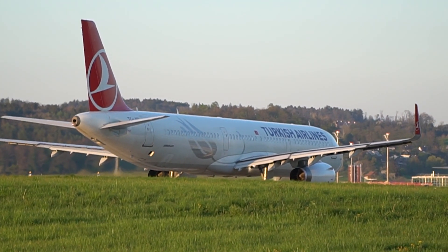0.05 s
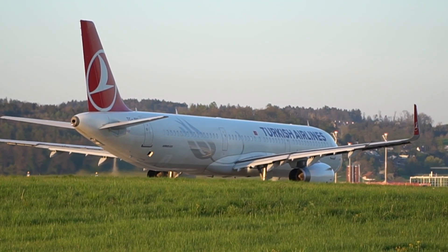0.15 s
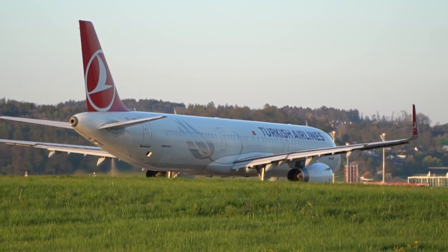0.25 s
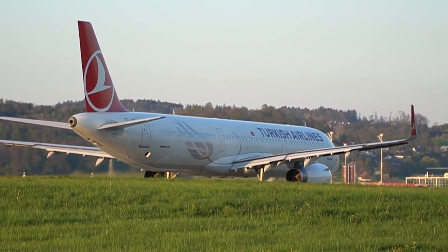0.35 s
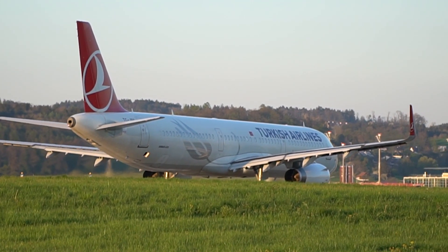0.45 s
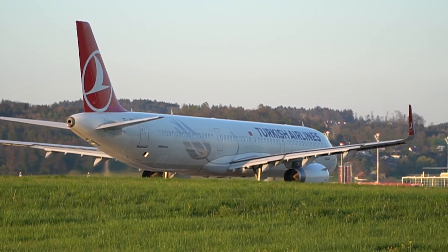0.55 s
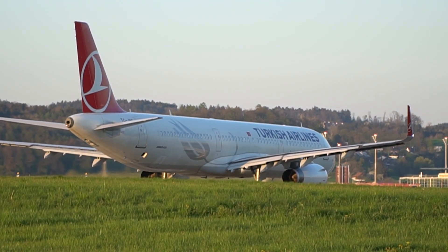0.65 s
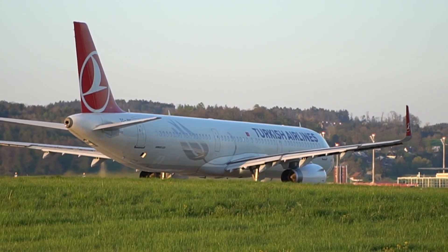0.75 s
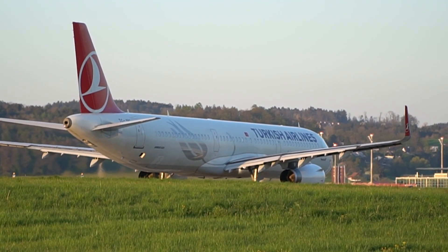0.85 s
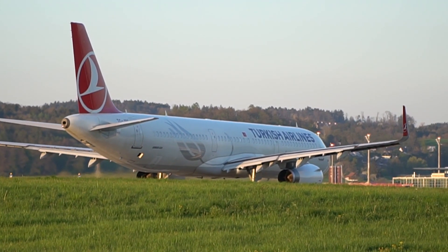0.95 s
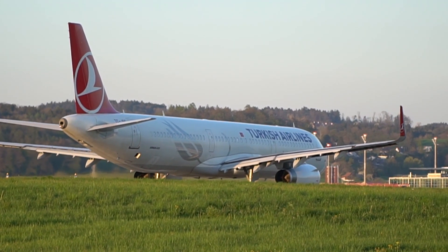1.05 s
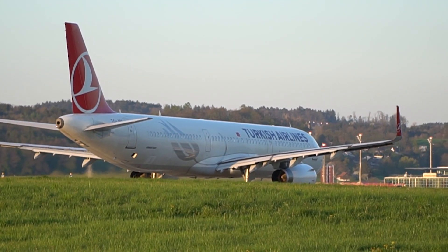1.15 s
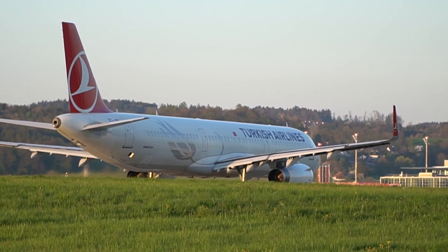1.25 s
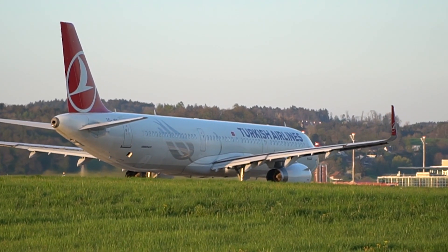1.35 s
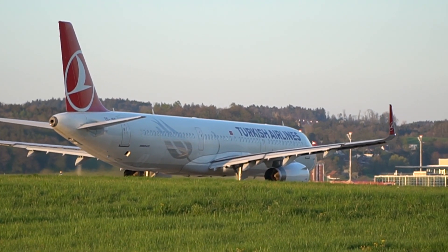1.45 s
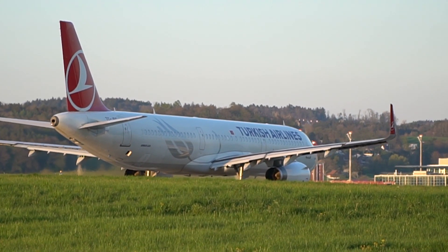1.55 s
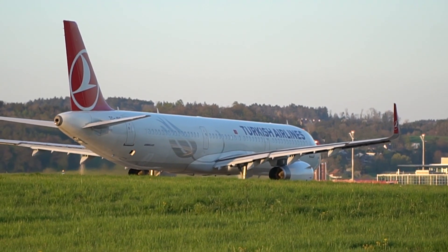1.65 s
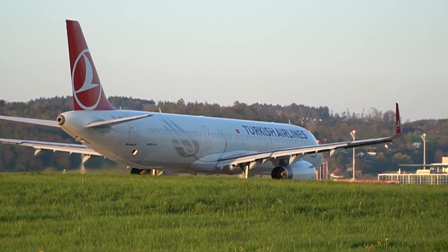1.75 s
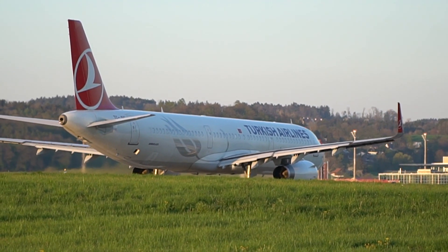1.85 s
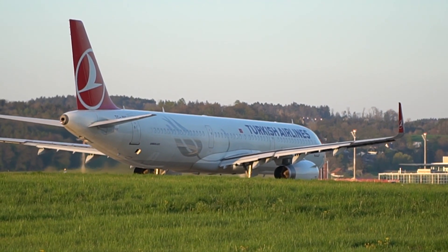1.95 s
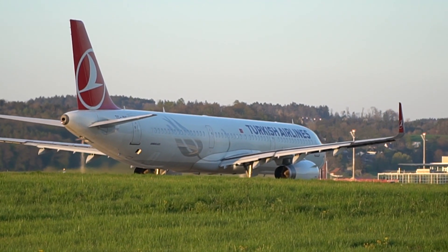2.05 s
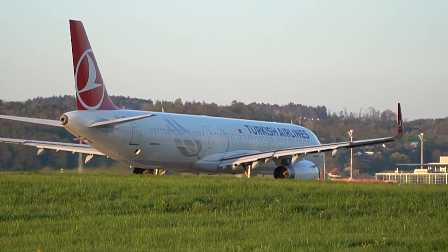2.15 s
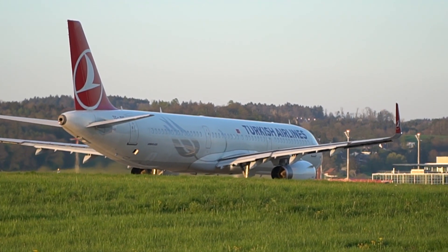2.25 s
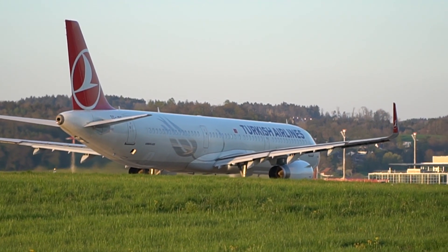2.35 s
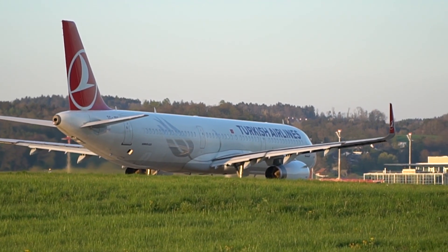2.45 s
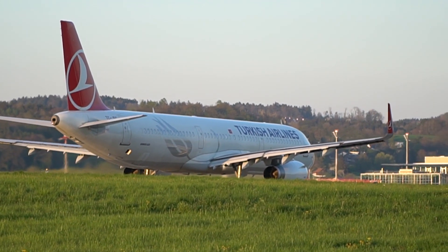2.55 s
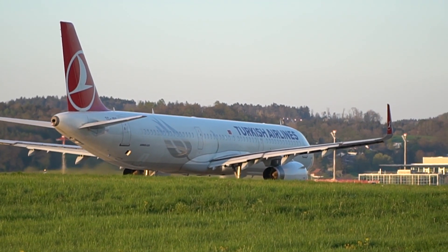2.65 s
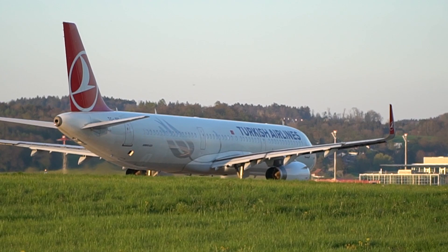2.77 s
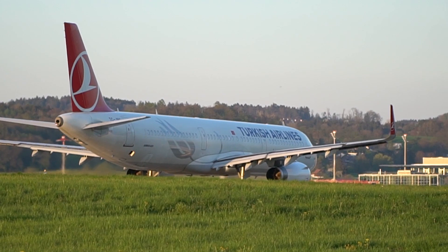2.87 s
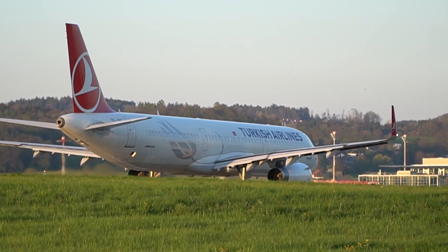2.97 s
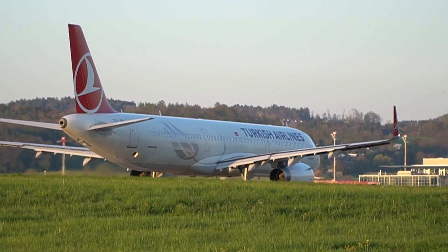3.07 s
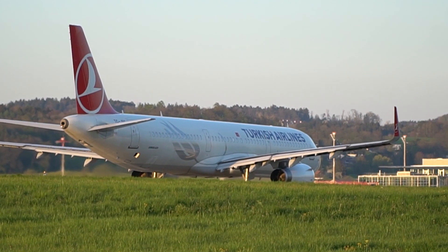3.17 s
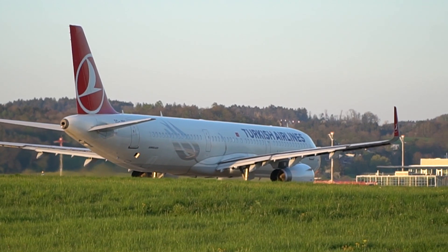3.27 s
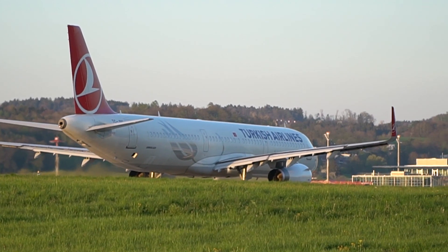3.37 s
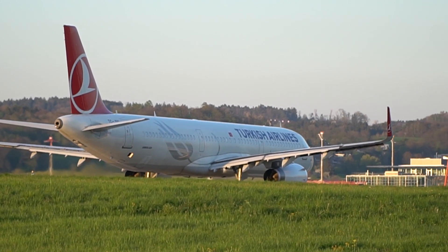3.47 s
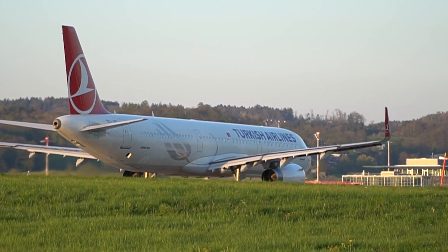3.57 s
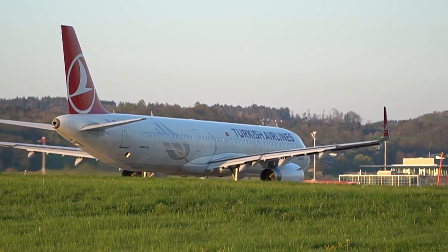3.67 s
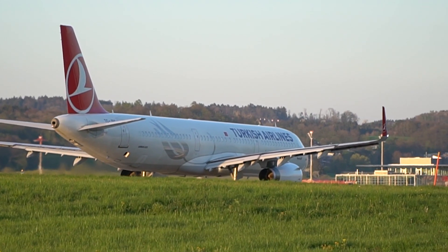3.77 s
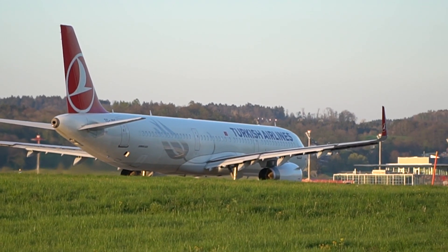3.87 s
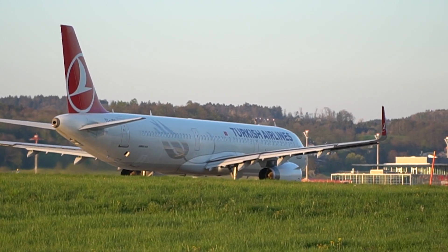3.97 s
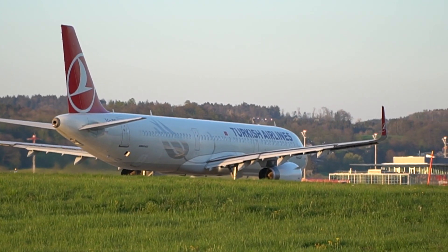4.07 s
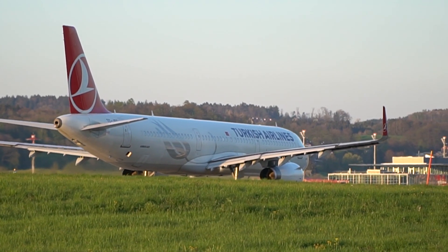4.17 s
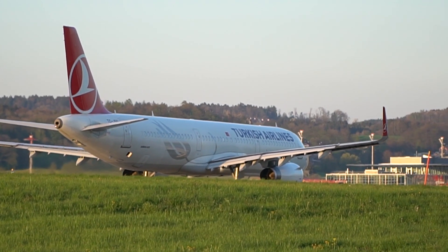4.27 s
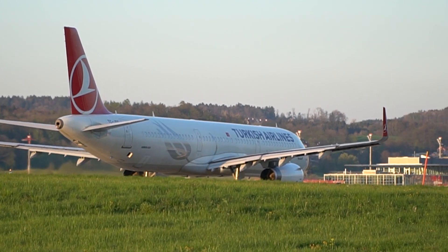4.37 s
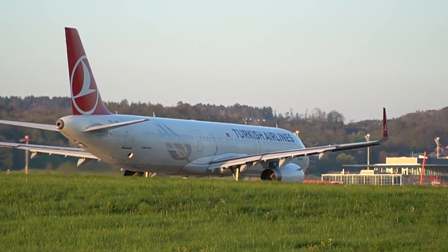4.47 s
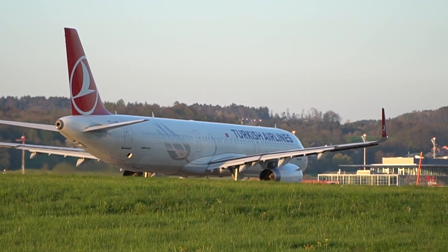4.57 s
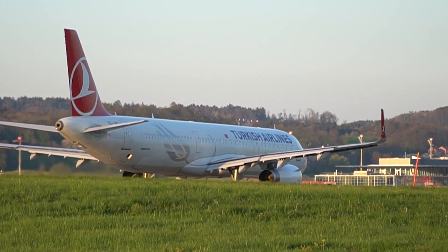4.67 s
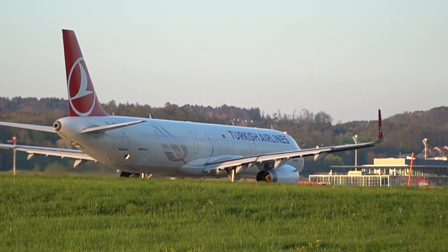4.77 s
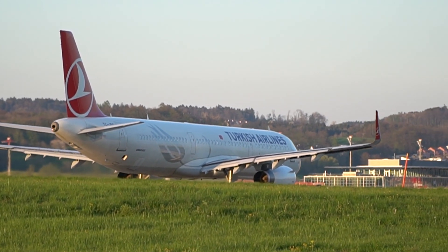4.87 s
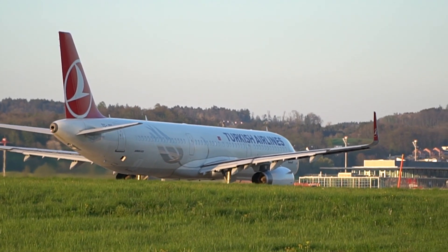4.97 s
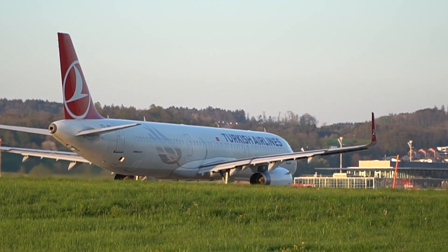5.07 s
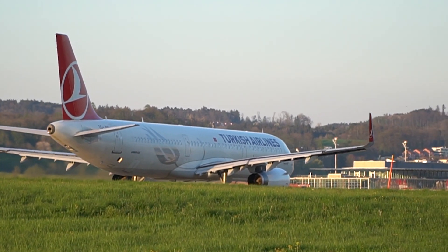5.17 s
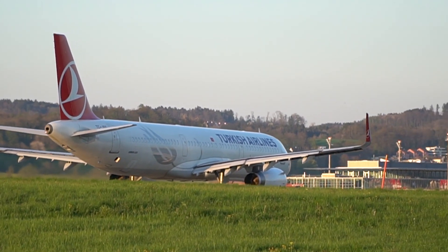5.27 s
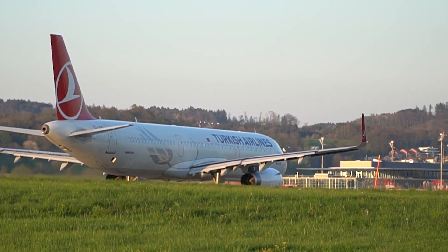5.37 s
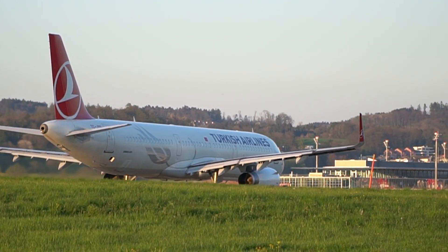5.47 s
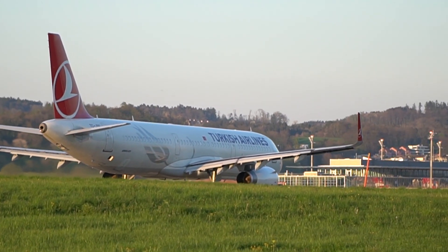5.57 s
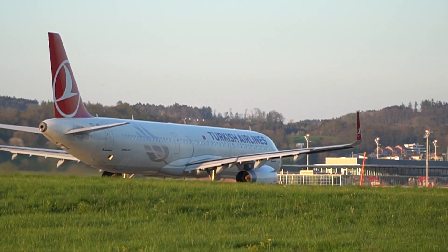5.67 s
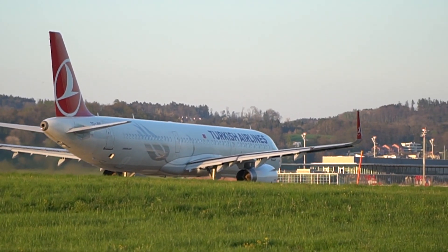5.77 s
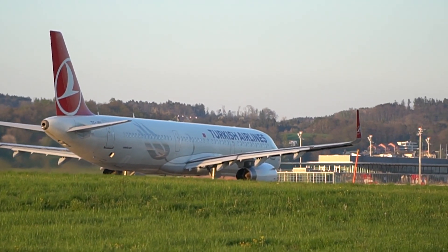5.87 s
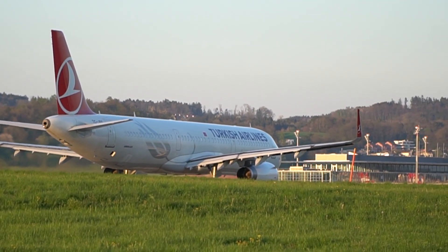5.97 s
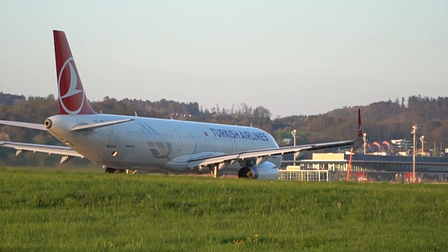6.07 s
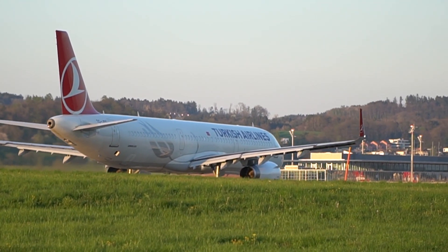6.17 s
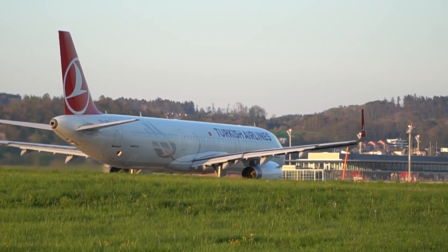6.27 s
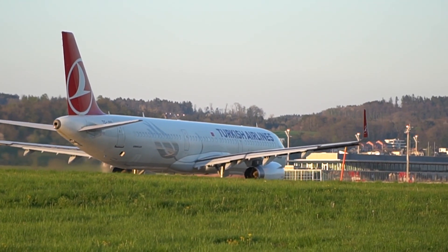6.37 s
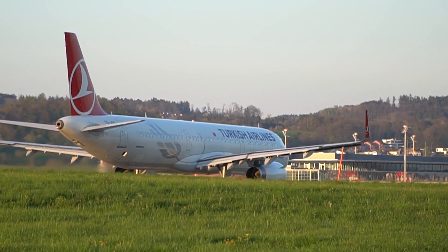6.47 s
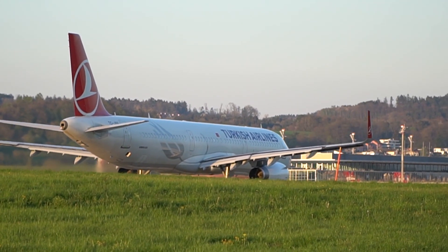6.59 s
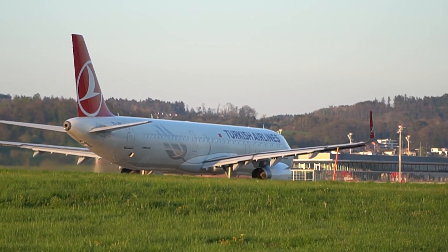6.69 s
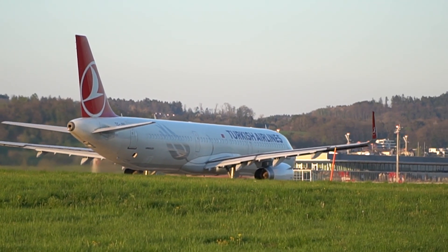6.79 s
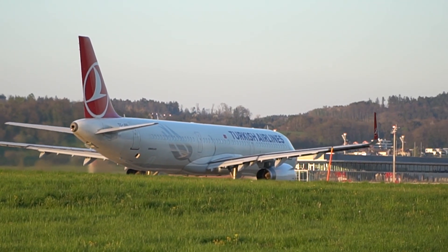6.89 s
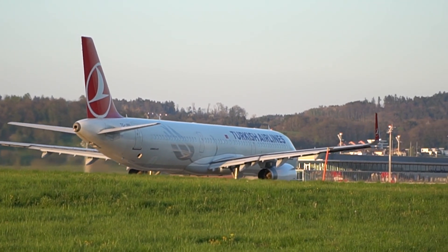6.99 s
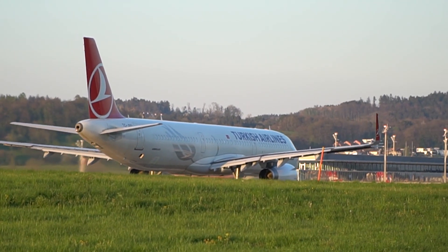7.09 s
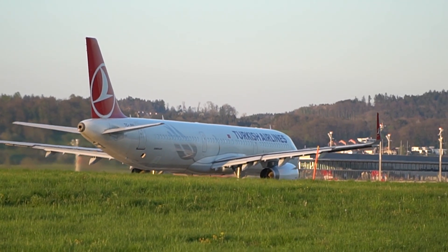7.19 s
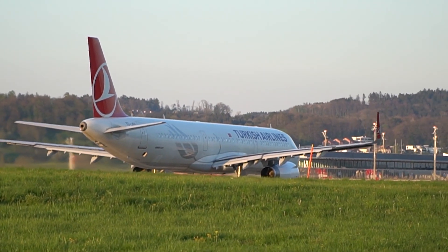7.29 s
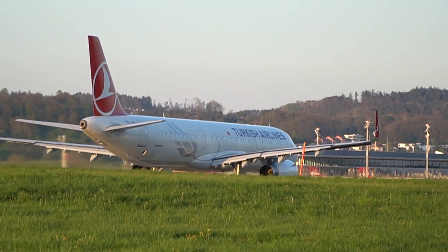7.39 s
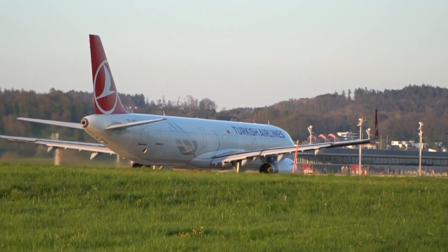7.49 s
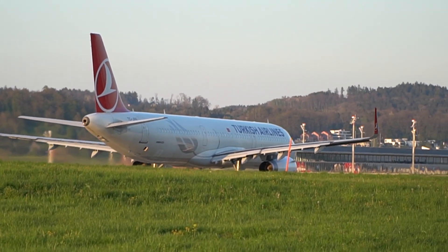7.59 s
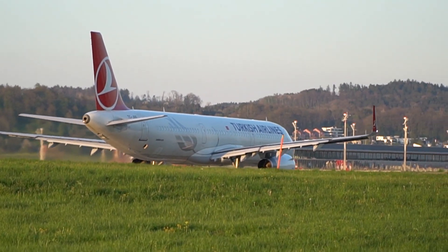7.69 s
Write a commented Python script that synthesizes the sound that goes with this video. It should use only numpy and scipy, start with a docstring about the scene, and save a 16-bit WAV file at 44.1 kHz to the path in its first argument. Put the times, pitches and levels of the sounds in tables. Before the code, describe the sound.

Two jet engines spool up for takeoff beyond a grass field. First a quiet, breathy whine with faint shaft tones, then short low wind bumps and flutter close on the microphone. Fan tones glide upward, slightly fluttering and smeared, one engine slower than the other. Exhaust noise swells steadily into a heavy, full-range roar, losing its treble and whine as the tail turns toward the listener.

```python
"""On a grass field behind a runway, an airliner opens its throttles for takeoff.
Two engines whine upward, one lagging behind: gliding tones made unsteady or smeared into narrow noise.
The exhaust is filtered noise that swells into a broad roar; a steady hiss and faint shaft tones lie under it.
The whine and treble fade as the tail swings toward the listener.
Puffs of wind, short bursts of dull noise, thump on the microphone, and the highest peaks clip flat."""
import sys
import numpy as np
from scipy import signal
from scipy.fft import rfft, irfft
from scipy.io import wavfile
from scipy.ndimage import map_coordinates

SR = 44100
rng = np.random.default_rng(int(sys.argv[2]) if len(sys.argv) > 2 else 0)


def transcribe(u):
    """Save the signal u as a 16-bit wav file named by the first command-line argument.

    u: samples, shape (n,) or (channels, n), limited to [-1, 1]; the rate is SR.
    q: integer samples, one column per channel.
    """
    v = np.clip(np.atleast_2d(u).T, -1, 1)
    q = np.round(v * 32767).astype(np.int16)
    wavfile.write(sys.argv[1], SR, q)


N = 341334
TIME = np.arange(N) / SR
BIN_HZ = np.maximum(np.fft.rfftfreq(N, 1 / SR), 1)

# How fast the leading engine's fan blades pass as the throttles open: (time [s], blade-passing rate [Hz])
FAN_SPEED = [(0, 727), (.5, 738), (1.25, 782), (2, 840.6), (2.5, 906.4), (3, 1014), (3.5, 1161),
             (3.95, 1330), (4.7, 1473), (5.25, 1523), (5.75, 1644), (6, 1714), (6.5, 1936), (7, 2167),
             (7.25, 2302), (7.74, 2340)]
IDLE_HZ, FULL_HZ = 735, 2300   # blade-passing rate at idle and at takeoff thrust
TURN_S = 6.9   # from here the tail swings toward the listener, and the high sounds are beamed away


def from_db(db):
    """Turn decibels into a gain."""
    return 10 ** (np.asarray(db) / 20)


def rms_one(x):
    """Scale to unit power."""
    return x / np.sqrt(np.mean(np.abs(x) ** 2) + 1e-30)


def in_time(rows):
    """Draw each column of a table as a curve, sample by sample."""
    s, *columns = np.transpose(rows)
    return [np.interp(TIME, s, column) for column in columns]


def at_hz(points, hz):
    """Read a table at any pitch, along a log-frequency axis."""
    table_hz, values = np.transpose(points)
    return np.interp(np.log1p(hz), np.log1p(table_hz), values)


def since(s):
    """Seconds gone by since a moment, zero before it."""
    return np.maximum(TIME - s, 0)


def octaves_above(hz):
    """Speed of the leading shaft, in octaves above a given blade-passing rate."""
    return np.log2(in_time(FAN_SPEED)[0] / hz)


def drift(rate):
    """Smooth chance of spread 1 that changes about rate times a second."""
    step = 20   # samples between the slow values
    r = np.exp(-2 * np.pi * rate * step / SR)
    chance = rng.standard_normal(N // step + 4002)
    slow = signal.lfilter([1], [1, -2 * r, r * r], chance)[4000:]   # drop the filter's start
    return np.interp(np.arange(N) / step, np.arange(len(slow)), rms_one(slow))


def white():
    """Spectrum of fresh white noise."""
    return rng.standard_normal(len(BIN_HZ)) + 1j * rng.standard_normal(len(BIN_HZ))


def reflection_db(hz):
    """Loss where direct and reflected sound cancel; a gliding tone dips as it crosses each notch."""
    # Cancelled bands: (centre [Hz], width [Hz], level [dB])
    notches = [(252.3, 42, -8.5), (1319, 242, -7), (2370, 590, -7.5), (3395, 420, -4.5), (4415, 290, -5),
               (5430, 430, -4.5), (6800, 1300, -3.5)]
    return sum(db * np.exp(-2 * ((hz - centre) / width) ** 2) for centre, width, db in notches)


def distant_noise(spectrum):
    """Stereo spectrum of a far noise source, notched by reflections."""
    # How alike left and right are: (frequency [Hz], likeness [0 to 1])
    likeness = [(60, 0.98), (120, 1), (240, 0.95), (480, 0.98), (950, 1), (1890, 0.95), (3770, 1),
                (7520, 0.76), (15000, 0.31)]
    colour_db = at_hz(spectrum, BIN_HZ) + reflection_db(BIN_HZ)
    alike = np.clip(at_hz(likeness, BIN_HZ), 0, 1)
    shared = np.sqrt(1 + alike) * white()
    opposite = np.sqrt(1 - alike) * white() * [[1], [-1]]
    return from_db(colour_db) * (shared + opposite)


def whine(hz, steady, flutter_hz, halo_db, halo_hz):
    """A tone heard through turbulence: its core fades and flutters, and a halo is scattered around it."""
    steady = np.clip(steady, 0, 1)   # share of the core's power that does not flutter
    flutter = drift(flutter_hz) + 1j * drift(flutter_hz)
    core = np.sqrt(steady) + np.sqrt((1 - steady) / 2) * flutter
    halo = from_db(halo_db) * (drift(halo_hz) + 1j * drift(halo_hz)) / np.sqrt(2)
    swing = core + halo
    phase = 2 * np.pi * np.cumsum(hz) / SR
    return rms_one(swing.real * np.cos(phase) - swing.imag * np.sin(phase))


def haze(hz, width_hz):
    """A tone scattered wholly into a band of noise that travels with its pitch."""
    steps = np.cumsum(np.abs(width_hz)) / SR   # the swing is drawn anew width_hz times a second
    in_phase, across = [map_coordinates(rng.standard_normal(N // 4), [steps], order=2, mode="wrap")
                        for _ in range(2)]
    phase = 2 * np.pi * np.cumsum(hz) / SR
    return rms_one(in_phase * np.cos(phase) - across * np.sin(phase))


def wind(puff_db, rise_s, decay_s, lumpy_db, apart, eddy_hz):
    """Eddies hit the microphone: short dull thumps over a lumpy flutter, partly different on each side."""
    # Puffs of wind, before puff_db is added to all: (time [s], level [dB])
    puffs = [(1.375, -33), (1.421, -27), (1.729, -16), (1.756, -21), (1.861, -21), (1.917, -30),
             (1.991, -20), (2.05, -25), (2.357, -20), (2.398, -17.5), (2.595, -25), (2.732, -36),
             (2.998, -22), (4.21, -17)]
    # Their tone colour: (frequency [Hz], level [dB per Hz])
    puff_colour = [(30, -30.5), (90, -9.5), (200, 0.5), (400, -1.5), (700, -17.5), (1200, -26),
                   (4000, -56.5)]
    # One gust flutters between the puffs, over a calm floor
    start_s, end_s, level_db, calm_db = 1.41, 2.6, -39, -60
    rise_db_per_s, fall_db_per_s = 150, 5.5
    before_start = np.maximum(start_s - TIME, 0)
    gust_db = level_db - rise_db_per_s * before_start - fall_db_per_s * since(end_s)
    envelope = from_db(np.maximum(gust_db, calm_db) + lumpy_db * drift(22))
    for s, db in puffs:
        age = TIME - s
        envelope = envelope + from_db(db + puff_db) * np.exp(-np.maximum(age / decay_s, -age / rise_s))
    unlike = apart * BIN_HZ / np.hypot(BIN_HZ, eddy_hz)   # large eddies cover both sides at once
    both_sides = white() + unlike * white() * [[1], [-1]]
    eddies = from_db(at_hz(puff_colour, BIN_HZ)) * both_sides
    return envelope * rms_one(irfft(eddies, N))


def air_rush():
    """Air rushing through the engines: a bright hiss, the same at any thrust, until the roar covers it."""
    # Colour of the hiss: (frequency [Hz], level [dB per Hz])
    hiss_colour = [(2000, -26), (3800, 0), (4900, -2), (6100, -2.5), (7000, -14.5), (9000, -36.5),
                   (14000, -60.5)]
    return from_db(-46.5) * rms_one(irfft(distant_noise(hiss_colour), N))


def core_spool():
    """Faint, slowly rising tones of the high-pressure shaft."""
    # Shaft speed: (time [s], turns per second [Hz])
    core_speed = [(0, 179), (.9, 185.7), (4.5, 225), (7.74, 230)]
    # Level shared by its tones: (time [s], level [dB])
    core_level = [(0, -46.5), (1.3, -51), (2.3, -41), (3, -48.5), (4.6, -52.5), (7.74, -59)]
    # The tones: (multiple of shaft speed, level relative to the shared one [dB])
    core_tones = [(3, 2), (6, 8), (22, -6), (38, -25)]
    turns, level_db = in_time(core_speed)[0], in_time(core_level)[0]
    tones = 0
    for multiple, db in core_tones:
        tone = whine(multiple * turns, steady=0.22, flutter_hz=10, halo_db=-2, halo_hz=50)
        tones = tones + from_db(db) * tone
    return from_db(level_db) * tones


def lag_engine():
    """The other fan sings out clearly, then climbs more slowly and sinks into the roar."""
    # The lagging fan: (time [s], blade-passing rate [Hz], level [dB])
    lag_fan = [(2.399, 887, -44), (2.67, 941.6, -26.5), (3.05, 1036, -31.5), (3.34, 1120, -24.5),
               (3.53, 1185, -24.5), (3.899, 1208, -24.5), (4.3, 1245, -25.5), (4.54, 1248, -30),
               (5.4, 1300, -33.5)]
    hz, fan_db = in_time(lag_fan)
    start, end = lag_fan[0][0], lag_fan[-1][0]
    fade_db = -60 * np.abs(TIME - np.clip(TIME, start, end))   # 60 dB per s outside the table
    return from_db(fan_db + fade_db) * whine(hz, steady=0.95, flutter_hz=13, halo_db=-3.0, halo_hz=60)


def turbine(wide_haze_db, octave_db):
    """Turbine tones leave through the hot jet, which smears them; the haze widens with shaft speed."""
    # Main stages: (multiple of blade-passing rate, relative level [dB])
    stages = [(3.89, -12), (3.97, -0.3), (4.03, -11)]
    # Higher stages, heard only at low thrust: (multiple of blade-passing rate, relative level [dB])
    upper_stages = [(4.51, 0), (6.55, -10.5)]
    # Change in a tone on its way across the field: (frequency [Hz], level [dB])
    air_path = [(500, 2), (4500, -0.5), (6000, -2.5), (8000, -15), (10000, -31), (14000, -42)]
    # Brief swells as the breeze carries the whine over: (time [s], gain [dB])
    swells = [(.35, 4.5), (.9, 9.5), (1.11, 10), (1.33, 5.5), (1.6, 5), (3.02, 8)]
    # Haze around the whine: (time [s], level [dB])
    haze_level = [(0, -43), (2, -38.5), (3, -39.5), (3.8, -45), (5, -56), (5.7, -47.5), (6.9, -44.5)]
    hz, speed = in_time(FAN_SPEED)[0], octaves_above(IDLE_HZ)

    main = 0
    for multiple, db in stages:
        tone = whine(multiple * hz, steady=0.87, flutter_hz=5.3, halo_db=-3, halo_hz=86)
        main = main + from_db(db) * tone
    centre = stages[1][0] * hz
    swell_s = .09   # half the length of a swell
    swell_db = sum(db * np.exp(-((TIME - s) / swell_s) ** 2) for s, db in swells)
    # The clear whine weakens by 11 dB per octave as the shaft speeds up
    main_db = -35.5 - 11 * speed + at_hz(air_path, centre) + swell_db

    upper = 0
    for multiple, db in upper_stages:
        tone_hz = multiple * hz
        tone_db = db + at_hz(air_path, tone_hz) + reflection_db(tone_hz)
        tone = whine(tone_hz, steady=.3, flutter_hz=20, halo_db=-4, halo_hz=80)
        upper = upper + from_db(tone_db) * tone
    # They die away by 23 dB per octave once the blade-passing rate is above 890 Hz
    upper_db = -41 - 23 * np.maximum(octaves_above(890), 0)

    share = .044 + .022 * speed   # sets the haze width as a share of the pitch
    narrow = haze(centre, 2 * share * centre)
    wide = from_db(wide_haze_db) * haze(centre, 4 * share * centre)
    octave_gain = from_db(octave_db + at_hz(air_path, 2 * centre))
    octave = octave_gain * haze(2 * centre, 4 * share * centre)
    smeared = from_db(in_time(haze_level)[0]) * (narrow + wide + octave)
    return from_db(main_db) * main + from_db(upper_db) * upper + smeared


def lead_engine():
    """Fan and turbine share one shaft: their tones climb together, then fade as the tail swings round."""
    hz, speed = in_time(FAN_SPEED)[0], octaves_above(IDLE_HZ)
    # Each: level at idle [dB] + growth [dB per octave of shaft speed], then the reflections' loss
    fan_db = -39 + 9 * speed + reflection_db(hz)
    octave_db = -46.5 + 11.5 * speed + reflection_db(2 * hz)
    fan = from_db(fan_db) * whine(hz, steady=0.48, flutter_hz=14, halo_db=0.5, halo_hz=45)
    octave = from_db(octave_db) * whine(2 * hz, steady=0.37, flutter_hz=20, halo_db=4.5, halo_hz=95)
    tones = fan + octave + turbine(wide_haze_db=-4.0, octave_db=-18.5)
    turn_db_per_s = 26
    return from_db(-turn_db_per_s * since(TURN_S)) * tones


def exhaust(waver_db, own_db):
    """Jet noise, growing with about the eighth power of speed, overtakes the engine's own gentler noise."""
    # Colour of the roar within each register: (frequency [Hz], level [dB per Hz])
    jet_colour = [(20, -39), (60, -18), (100, -2), (200, 1.5), (330, -13), (520, -6), (700, -4), (1100, 3),
                  (1900, -5), (2900, -5), (4000, -11.5), (6000, -21), (9000, -39.5), (11000, -54),
                  (15000, -83)]
    # Borders between registers, from deep rumble to top hiss: (frequency [Hz])
    register_edges = [135, 245, 650, 1350, 2400, 6500]
    # Registers, low to high: (engine noise at idle [dB], jet at full thrust [dB],
    # jet growth [dB per octave of shaft speed], loss in the turn [dB per s])
    registers = [(-48.5, -21, 28.5, 1.3), (-38.5, -18, 34, 2.5), (-43, -17, 29, 2.5), (-30, -11, 27, 1.3),
                 (-41, -17.5, 22, 3.5), (-39.5, -14.5, 33, 8), (-60.5, -37.5, 24, 11.5)]
    noise = distant_noise(jet_colour)
    register = np.searchsorted(register_edges, BIN_HZ)
    above_idle, above_full = octaves_above(IDLE_HZ), octaves_above(FULL_HZ)
    air = drift(4)   # moving air makes all registers waver together
    out = 0
    for k, (idle_db, full_db, growth_db, turn_db) in enumerate(registers):
        engine = from_db(idle_db + 3.5 * above_idle)   # 3.5 dB per octave
        jet = from_db(full_db + growth_db * above_full)
        path = from_db(waver_db * air + own_db * drift(10.4) - turn_db * since(TURN_S))
        band = rms_one(irfft(noise * (register == k), N))
        out = out + np.hypot(engine, jet) * path * band
    return out


def microphone_pair(x):
    """The two capsules differ a little in level and phase across the spectrum."""
    # Level balance: (frequency [Hz], left minus right [dB])
    lean = [(60, -0.5), (99, -0.5), (160, -0.5), (270, 0.0), (450, 0.5), (740, -1.5), (1220, 0.5),
            (2010, -6.5), (3330, -1.5), (5500, 0.0), (9080, 1.5), (15000, -3)]
    # Phase balance: (frequency [Hz], lead of left over right [radians])
    lead = [(0, -0.24), (1210, 0.0), (1720, -0.55), (2150, 0.45), (4050, 0.5), (4480, 0.63), (5510, -0.027),
            (6980, 0.43), (10500, -0.1), (15500, 0.1)]
    half = np.array([[.5], [-.5]])   # each side takes half of the difference
    gain = from_db(half * at_hz(lean, BIN_HZ))
    turn = np.exp(1j * half * at_hz(lead, BIN_HZ))
    return irfft(rfft(x) * gain * turn, N)


def scene():
    """The aircraft, the breeze and a faint even microphone hiss."""
    breeze = wind(puff_db=-5.0, rise_s=0.0015, decay_s=0.011, lumpy_db=5.0, apart=1.36, eddy_hz=450)
    engines = air_rush() + core_spool() + lag_engine() + lead_engine()
    aircraft = engines + exhaust(waver_db=0.69, own_db=0.29)
    hiss = from_db(-61) * rng.standard_normal((2, N))
    return microphone_pair(aircraft) + breeze + hiss


def record(dry):
    """The microphone clips the highest peaks flat; then a steep filter cuts the top."""
    limit = from_db(-.5)
    clipped = np.clip(dry, -limit, limit)
    low_pass = signal.ellip(10, .2, 70, 15700, fs=SR, output="sos")   # cutoff 15700 Hz
    return signal.sosfilt(low_pass, clipped)


dry = scene()
out = record(dry)
transcribe(out)
```